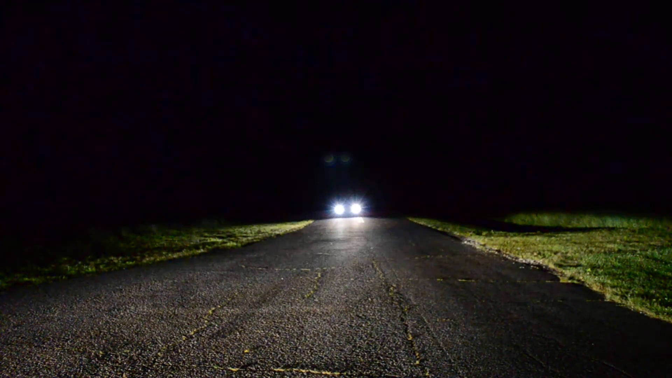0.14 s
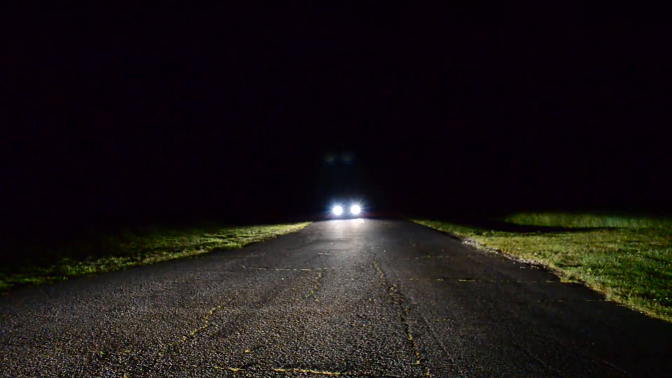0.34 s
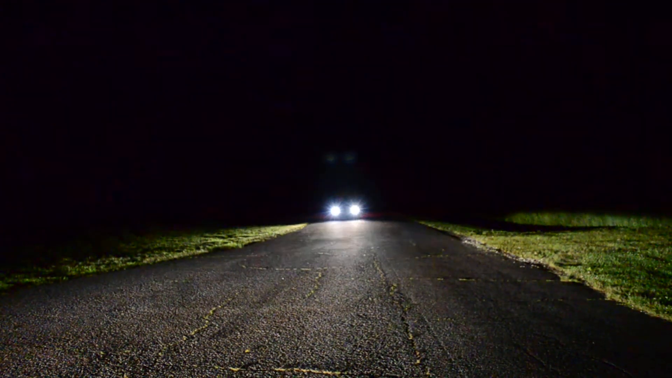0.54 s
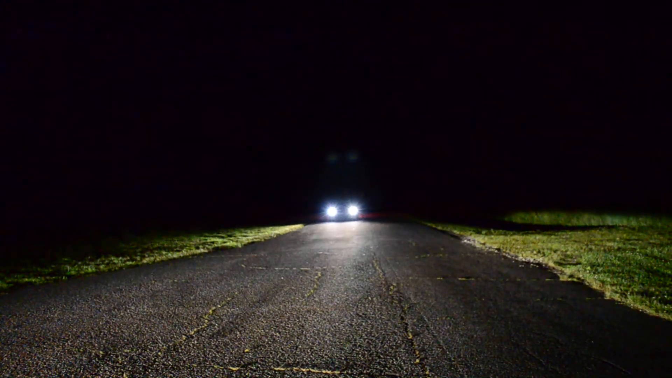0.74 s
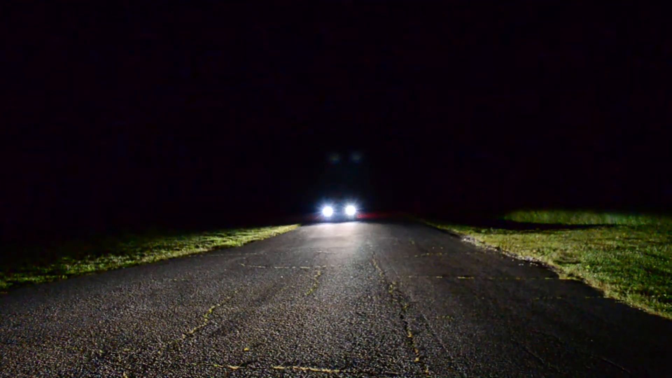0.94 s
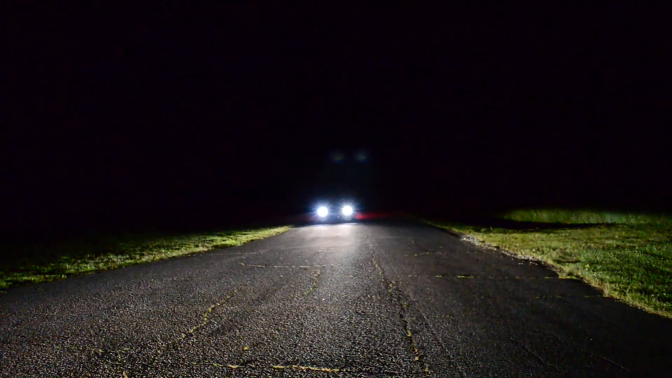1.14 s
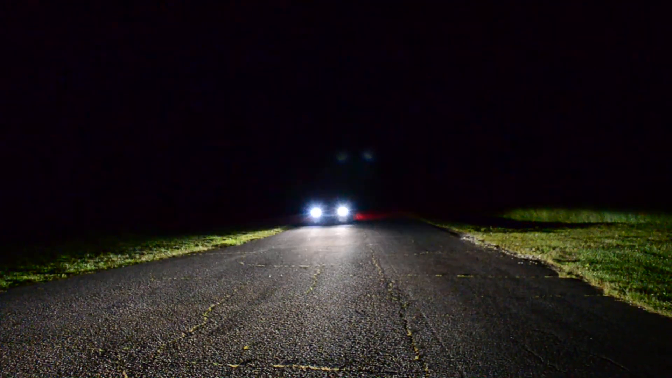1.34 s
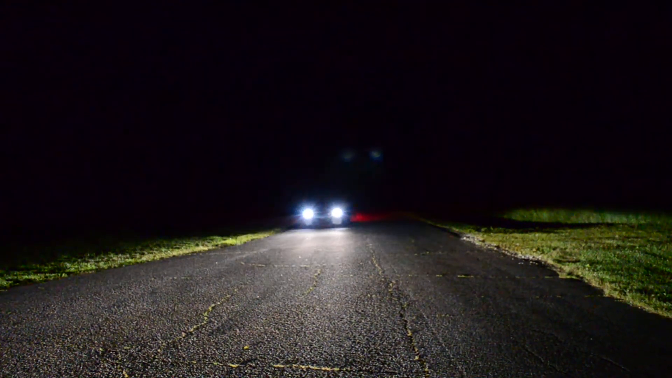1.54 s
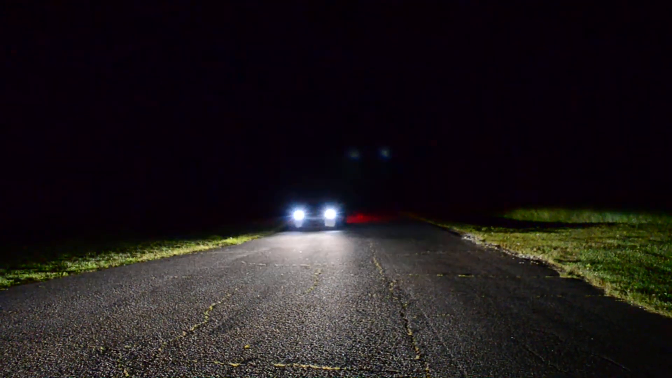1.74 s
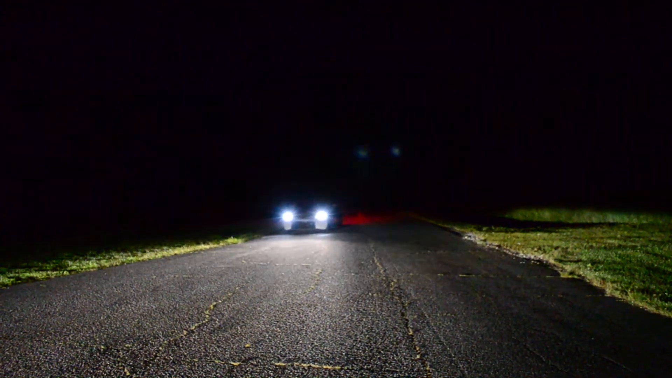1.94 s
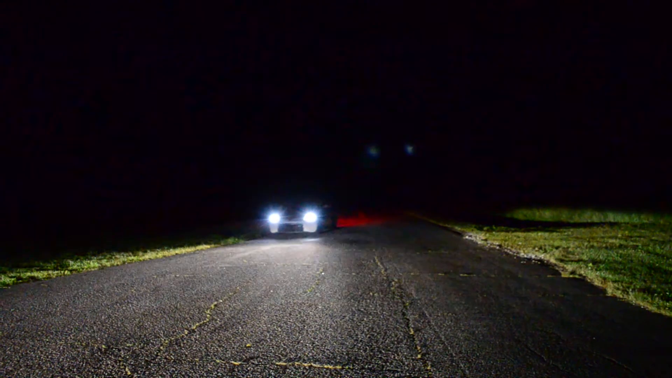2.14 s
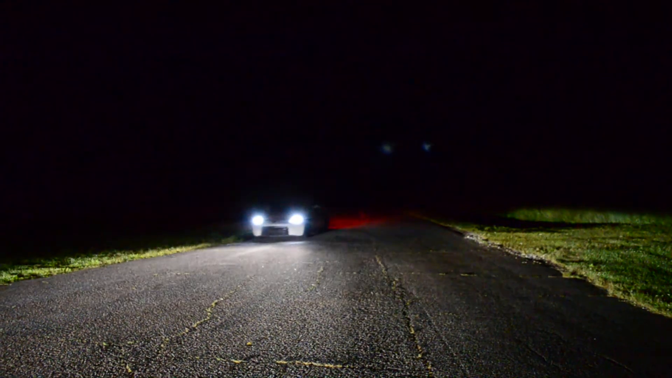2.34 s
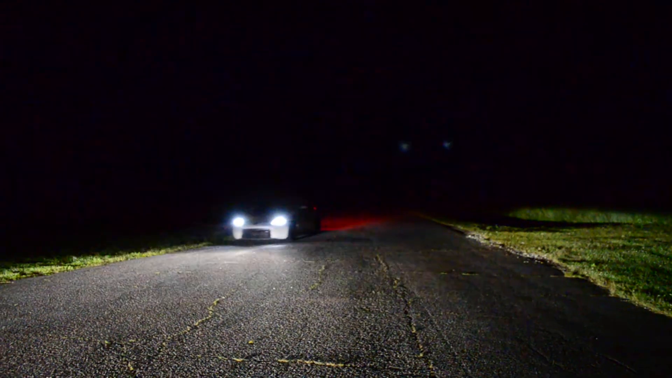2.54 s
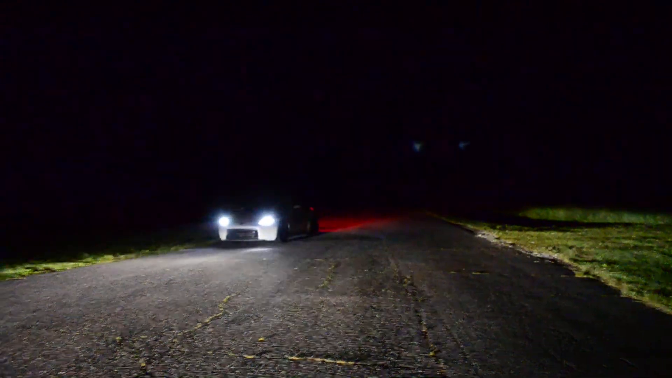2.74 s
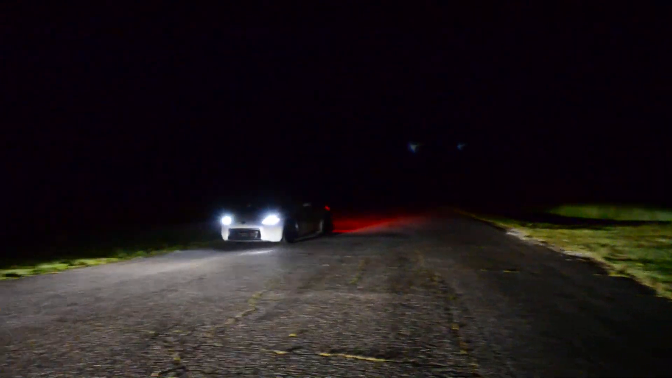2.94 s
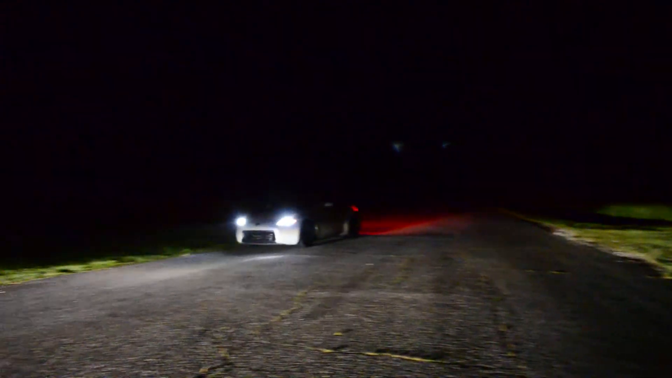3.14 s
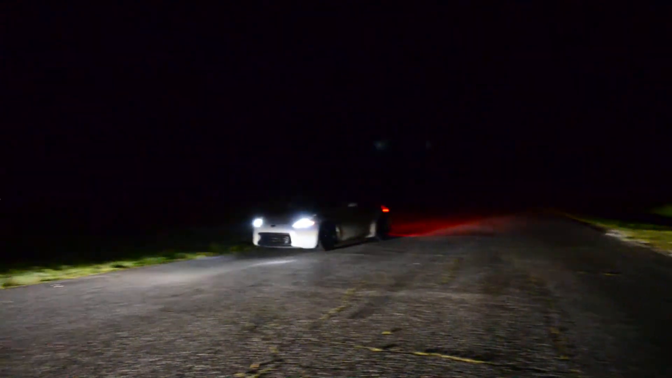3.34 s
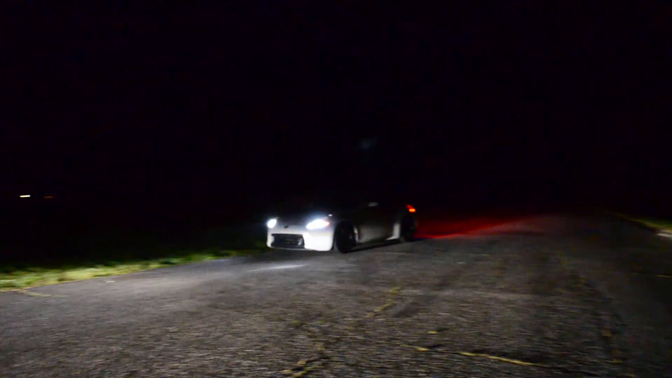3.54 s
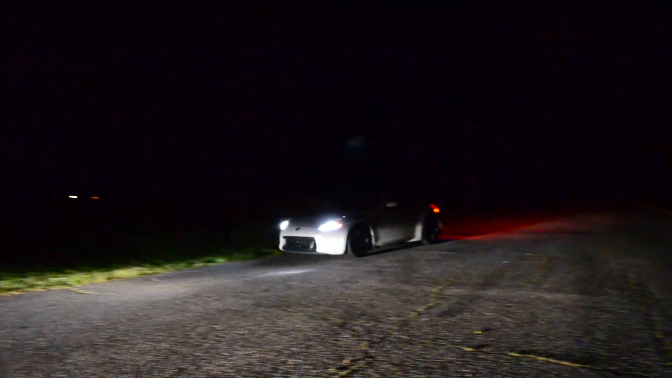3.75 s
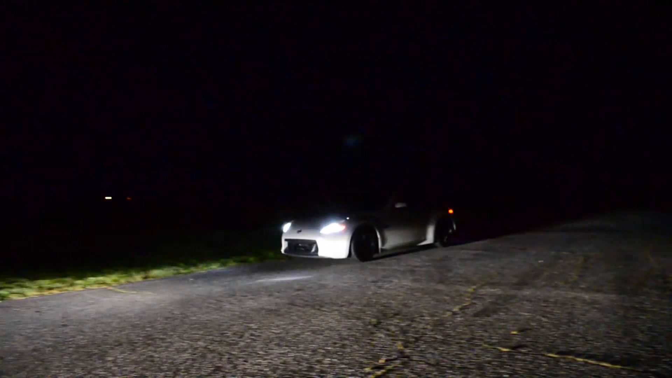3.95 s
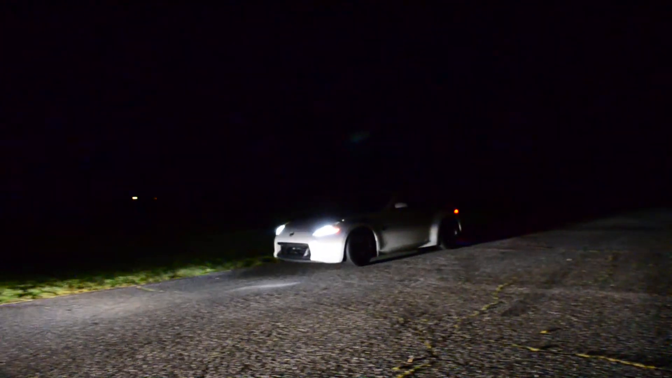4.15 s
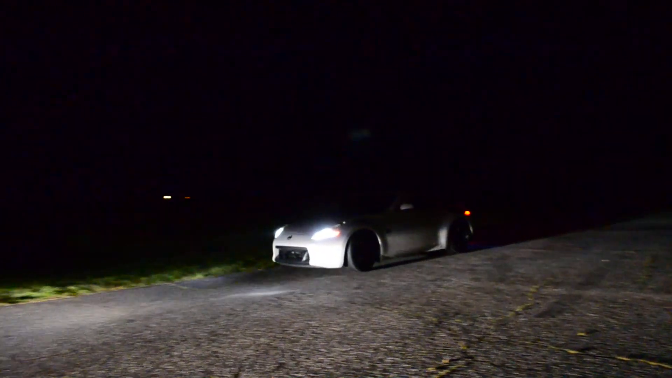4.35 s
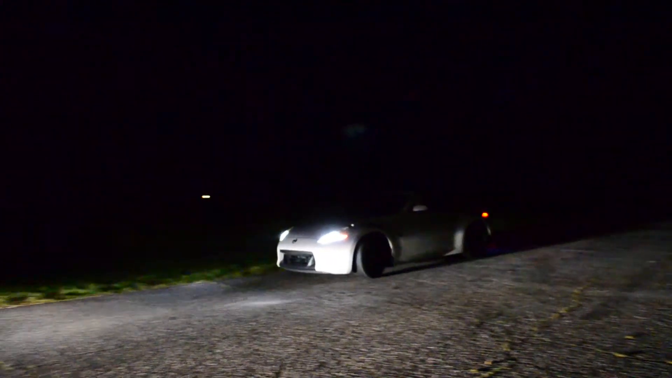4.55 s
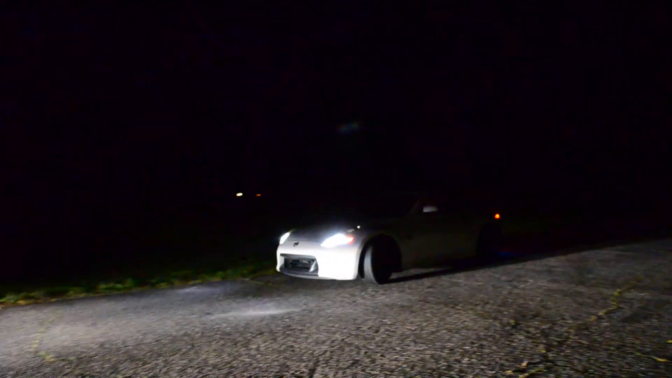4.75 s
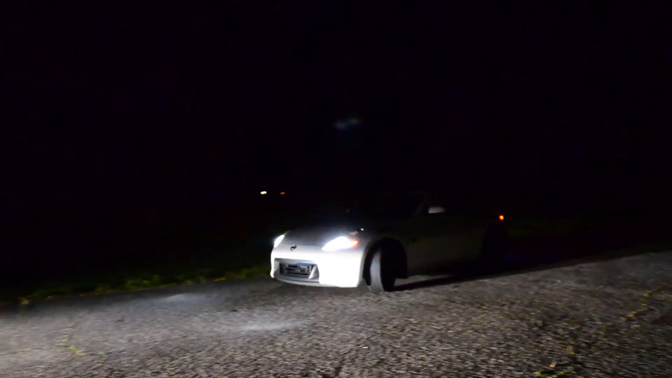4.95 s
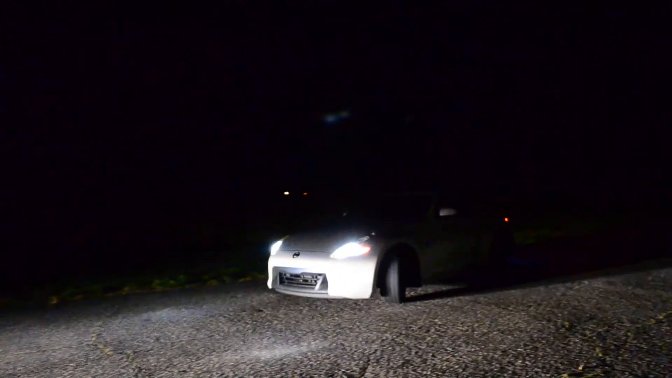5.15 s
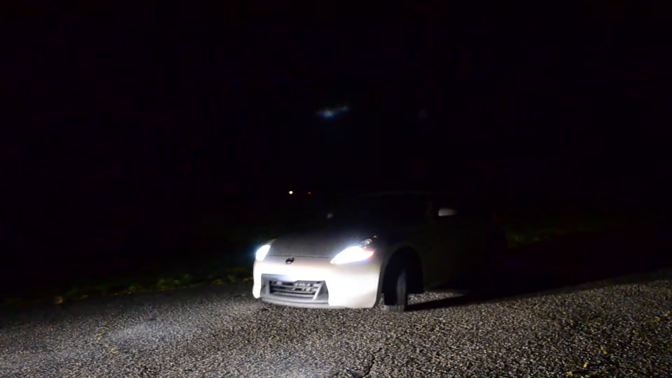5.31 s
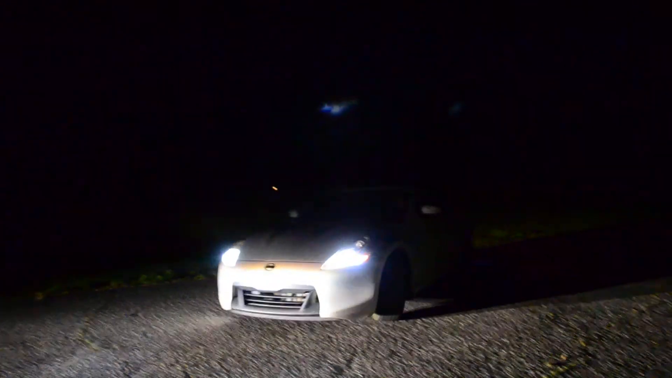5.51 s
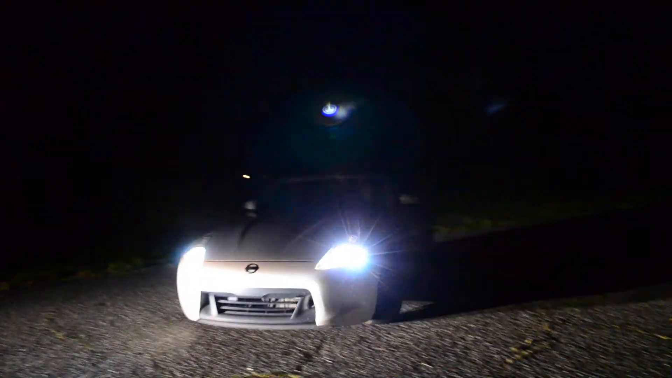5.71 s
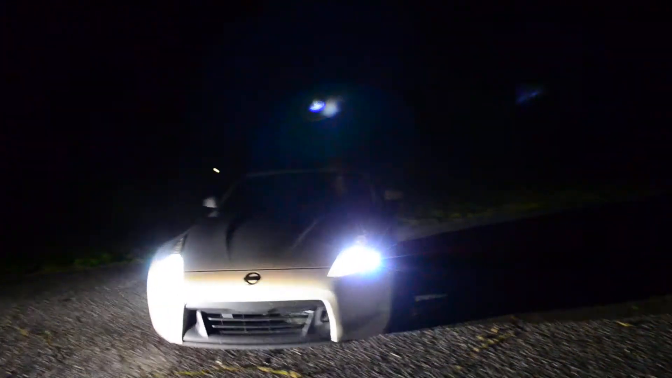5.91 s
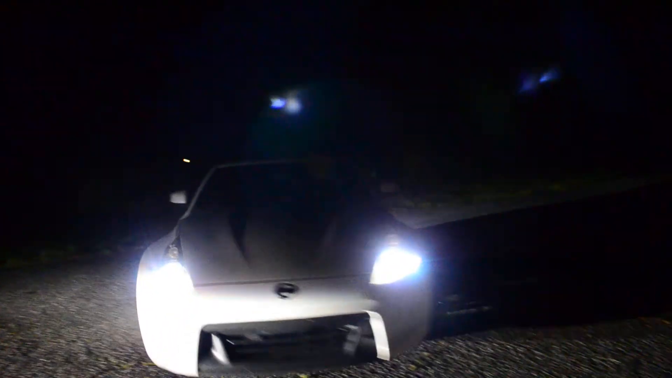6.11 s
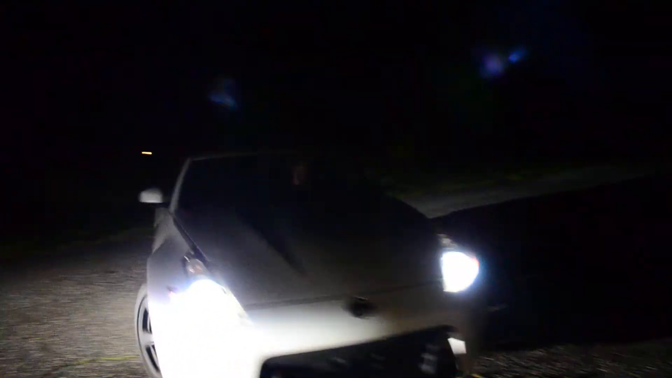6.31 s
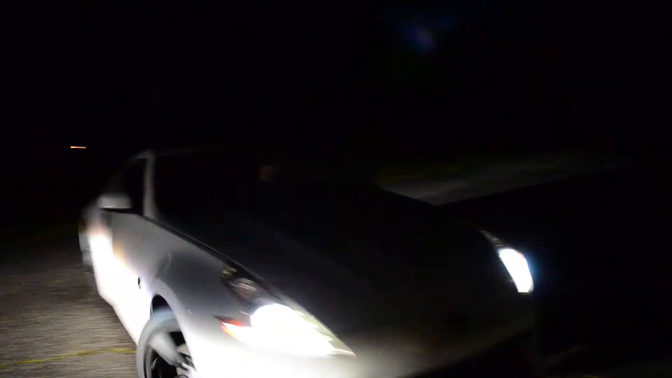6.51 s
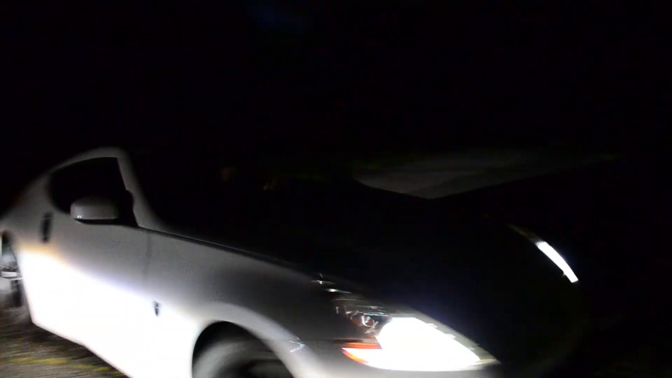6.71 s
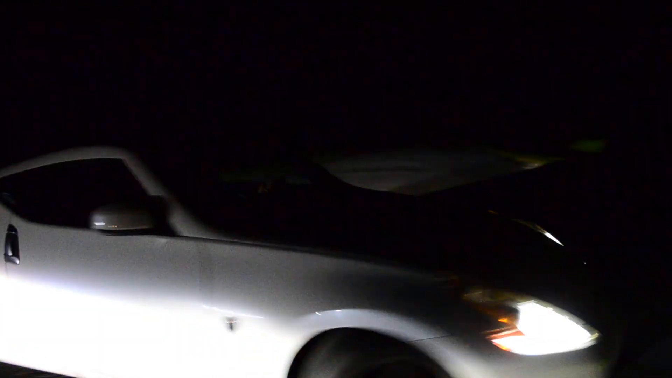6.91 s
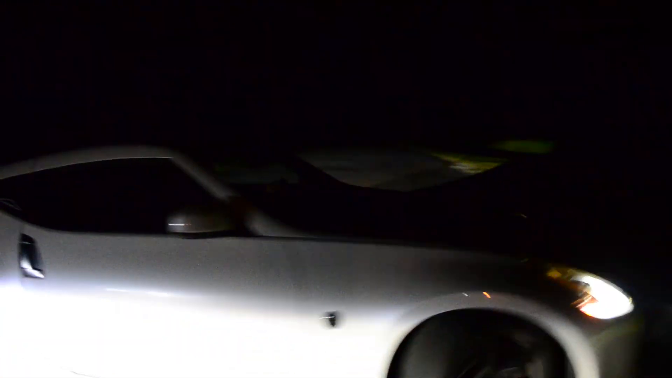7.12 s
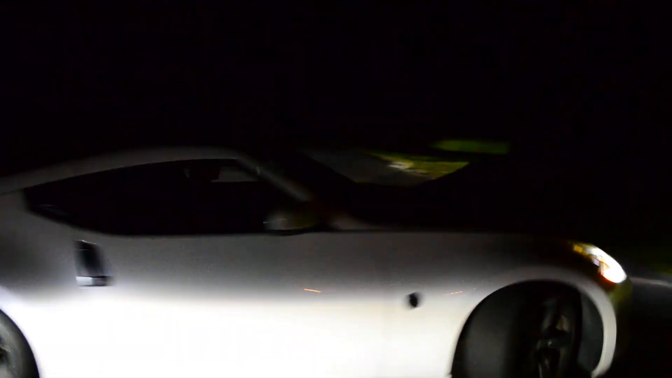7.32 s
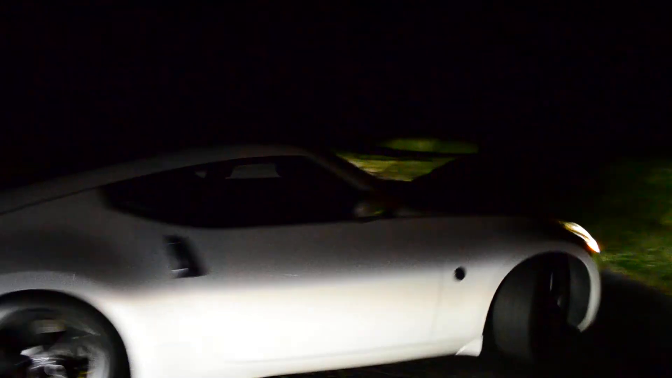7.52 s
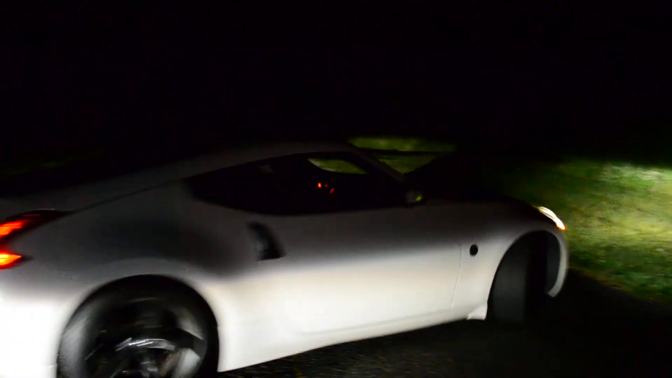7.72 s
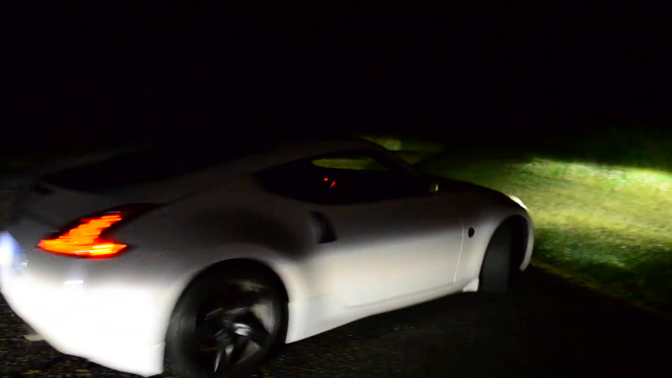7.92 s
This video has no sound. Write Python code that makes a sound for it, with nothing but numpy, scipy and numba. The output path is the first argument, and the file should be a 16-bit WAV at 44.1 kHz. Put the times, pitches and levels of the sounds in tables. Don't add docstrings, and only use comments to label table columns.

```python
import sys
import numpy as np
from scipy import signal
from scipy.io import wavfile
from scipy.ndimage import uniform_filter1d
from numba import njit

SR = 44100
rng = np.random.default_rng(int(sys.argv[2]) if len(sys.argv) > 2 else 0)


def persist_wave(psi):
    counts = np.round(np.clip(psi, -1, 1) * 32767).astype(np.int16)
    wavfile.write(sys.argv[1], SR, np.atleast_2d(counts).T)


def boost(x):
    u = np.asarray(x, float) / 20
    return 10 ** u


N = 351477
T = np.arange(N) / SR

# t/s, stroke rate/Hz, level/dB
TRILL = [(0, 43, -64), (.7, 44.5, -66.5), (1.3, 43, -64.5), (1.7, 44.2, -67.5), (2.74, 43.5, -67.5)]
# from/s, to/s, f/Hz, pulse rate/Hz, level/dB
FROG_RATTLES = [
    (0, 0.347, 2500, 38, -56.5),
    (2.564, 3.398, 2233, 38, -48.5),
    (3.56, 3.749, 2468, 30, -54.5),
]
FROG_SWELL_DB = 2
# t/s, level/dB, f/Hz
CHIRPS = [(.44, -62, 3430), (.97, -68, 3420), (1.01, -61, 3450), (1.58, -60, 3450), (1.99, -60, 3380),
          (2.12, -57, 3450), (2.9, -56, 3200)]

# t/s, rolling noise/dB, distance/m, tread resonance/dB
ROAD = [(0, -31.5, 100, 3), (1.4, -32.5, 75, 0), (1.95, -35, 24, 0.5), (2.84, -35, 21, -1.5),
        (3.44, -37, 17, -3.5), (3.84, -40.5, 12, -6.5), (4.6, -39, 10, -7), (4.9, -36.5, 10, -0.5),
        (5.4, -33.5, 18, 0.5), (5.88, -33.5, 7.8, -2.5), (6.25, -34, 3.1, 1), (6.48, -31, 1.3, 4),
        (6.62, -29.5, 2.2, 1), (6.77, -28, 1.8, 4.5), (7.04, -30, 1.8, 0.5), (7.5, -32, 3.4, -4.5),
        (7.66, -32.5, 3.2, -6.5), (7.97, -32.5, 3.6, 1)]
NEAR_M, DIP_FAR_HZ, DIP_HZ_M = 12.5, 804, 660
# f/Hz, density/dB per Hz
RUMBLE_SPECTRUM = [(12, -67), (20, -29), (64, -1.5), (86, 15), (139, 5), (166, -11), (219, 8), (257, 0),
                   (393, -19.5), (437, -17.5), (480, -17.5), (620, -38), (1060, -120)]
RUMBLE_DB, RUMBLE_PER_LOAD, RUMBLE_PER_BARK, RUMBLE_PER_ROLL = -31, 0.14, 0.3, 0.66
RUMBLE_FAR_TILT_DB, RUMBLE_PIVOT_HZ = 6, 190
# f/Hz, density/dB per Hz
ROAR_FAR = [(400, -11), (500, -4.5), (650, 2), (850, 1.5), (1000, -0.5), (1160, 2), (1430, -15.5),
            (1750, -6.5), (2100, -21), (2500, -32), (3000, -29), (3500, -43.5), (3900, -40), (5500, -54)]
# f/Hz, density/dB per Hz
ROAR_NEAR = [(400, -11), (560, 2), (700, 3), (900, 3.5), (1300, 9), (1650, -2.5), (2000, -5), (2500, -16.5),
             (3500, -17), (4500, -28), (5500, -30.5)]
# f/Hz, density/dB per Hz
HISS_SPECTRUM = [(4500, 0.0), (5500, -4), (7000, -10), (9000, -12.5), (11500, -8), (13500, -15),
                 (14800, -24), (15800, -25)]
SIZZLE_DB, SIZZLE_LOSS_DB_M, HISS_DB, HISS_LOSS_DB_M = -16.5, 0.08, -28.5, 0.36
# from/s, to/s, sizzle/dB, hiss/dB
SCRUBS = [
    (3.251, 3.648, 3.5, 0.5),
    (4.6, 4.998, 2, 1.5),
    (6.373, 6.557, 2, 2.5),
    (7.35, 8.2, -1, 3),
]
# f/Hz, width/Hz, level/dB
HUM = [
    (663, 20, -49.5),
    (1330, 95, -48.5),
    (1867, 70, -53),
]
HUM_FROM_S, HUM_TO_S = 3.3, 5.2
# t/s, peak/dB, body re peak/dB
STONES = [(1.3644, -33.5, 9), (3.3054, -41, 10.5), (4.402, -31, 1), (5.5235, -45, 8.5), (5.91, -29.5, 7.5),
          (6.11, -44.5, 5.5), (6.3893, -31.5, 10.5), (6.4537, -24.5, 7.5), (6.506, -23, 7.5),
          (6.5504, -30, 8.5), (6.609, -30.5, 2), (6.6388, -34.5, -6), (6.7356, -31, 2), (6.763, -41, -3.5),
          (6.8628, -34, 4), (6.881, -25, 8.5), (7.1518, -22, 7), (7.236, -33, 13.5), (7.2876, -25.5, 4.5),
          (7.49, -22.5, 1), (7.7578, -30, 7.5)]
STONE_DECAY_S = 0.0054
# t/s, peak/dB, f/Hz
TICKS = [(1.3638, -44.5, 6950), (5.9122, -52, 6000), (6.389, -39.5, 6590), (6.4265, -41, 7600),
         (6.4543, -42, 6380), (6.4789, -44, 7170), (6.5012, -35, 6180), (6.5488, -36.5, 6550),
         (6.6105, -43, 6200), (6.64, -41.5, 6310), (6.7438, -38, 9830), (6.7672, -36.5, 9660),
         (6.8314, -42.5, 6860), (6.863, -43.5, 7260), (6.9227, -42, 6310), (6.9774, -39, 6490),
         (6.9922, -38.5, 6120), (7.0147, -39, 7080), (7.1524, -32, 7480), (7.2583, -36.5, 6890),
         (7.3037, -37, 6330), (7.323, -37, 7430), (7.477, -39, 7130), (7.4906, -35.5, 7080),
         (7.5738, -41, 6130), (7.6147, -39, 6050), (7.719, -39, 7110), (7.763, -44, 6980),
         (7.788, -37.5, 6200), (7.8533, -36, 6780)]
# t/s, peak/dB, f/Hz
KNOCKS = [(0.887, -26.5, 990), (1.363, -27, 1240), (4.697, -19.5, 1207), (5.079, -22.5, 1330),
          (5.186, -18.5, 1206), (5.214, -24.5, 1130), (5.234, -18.5, 1160), (5.534, -17, 1144),
          (5.609, -23, 1122), (5.815, -17.5, 1251), (5.912, -15.5, 686), (6.206, -26, 1300),
          (6.303, -21, 686), (6.378, -20, 1260), (6.504, -15, 1452), (6.549, -18, 1239),
          (6.608, -12.5, 1380), (6.643, -9, 1362), (6.685, -14, 930), (6.734, -11, 600), (6.75, -10, 646),
          (6.761, -10.5, 1460), (6.797, -8.5, 730), (6.819, -12, 583), (6.951, -15.5, 930),
          (7.093, -16.5, 791), (7.147, -13.5, 713), (7.286, -14, 779), (7.554, -31, 622),
          (7.741, -14.5, 1280)]

# t/s, firing rate/Hz
REVS = [(1.67, 64.65), (1.91, 109.7), (2.0, 114.1), (2.13, 100.4), (2.66, 93.75), (2.95, 86.63),
        (3.21, 72.5), (3.68, 84.5), (4.0, 77.5), (4.44, 77.33), (4.9, 68.22), (5.35, 53), (5.56, 54.15),
        (6.29, 67.5), (6.58, 61.34), (6.89, 47.24), (7.5, 71.6), (7.88, 79.3)]
# t/s, level/dB
LOAD = [(1.65, -46.5), (1.78, -26.5), (2.35, -24.5), (2.5, -21), (2.93, -20), (3.2, -34.5), (3.6, -22),
        (4.0, -26), (5.03, -28.5), (5.15, -23.5), (5.4, -28), (5.75, -24.5), (6.05, -15.5), (6.2, -19),
        (6.55, -26), (6.9, -22.5), (7.3, -17), (7.55, -22.5)]
# f/Hz, gain/dB
BOOM = [(48, -20.5), (60, -15.5), (69, -1.5), (106, -1.5), (123, 3.5), (135, -2), (160, -10.5), (195, -23)]
# multiple of firing rate, level/dB
ORDERS = [(2.5, -4), (3, -0.5), (3.5, -9.5), (4, 0), (4.5, -5), (5, -0.5), (6, -4)]
# f/Hz, width/Hz, gain/dB
PIPE = [(120, 44, 5.5), (190, 19, 2.5), (270, 29.3, 6), (326.5, 20, -7.5)]
# t/s, length/s, level/dB, start f/Hz, end f/Hz
RINGS = [
    (1.56, 0.17, -29, 109.3, 127),
    (2.41, 0.12, -33, 190, 191),
    (7.072, 0.267, -33.5, 329.8, 388),
    (7.569, 0.27, -27, 264.6, 278),
]
# from/s, to/s, extra scatter 0-1
COASTS = [
    (-1, 1.52, .55),
    (3.0, 4.6, .17),
    (4.6, 5.08, .7),
    (5.08, 5.5, .25),
    (6.3, 7.05, .15),
    (6.78, 6.95, .2),
    (7.4, 9, .06),
]
STEADY_ROUGH, COAST_EASE_S = 0.17, 0.2
# from/s, to/s, gain/dB
BARKS = [
    (2.45, 3.1, 5),
    (3.403, 4.55, -2),
    (5.894, 6.494, 5.5),
    (7.23, 7.91, 9.5),
    (7.42, 7.74, 5.5),
]
BARK_EASE_S = 0.034
BANK_DB, FLUTTER_DB = -14, 2
UPPER_DB, UPPER_PER_LOAD, UPPER_NEAR_DB = -55, 0.57, 9.5
NOSE_S, NOSE_BASS_DB, NOSE_OCTAVE_DB = 5.17, -10.5, 4
TAIL_S, TAIL_SWING_S, TAIL_BASS_DB, TAIL_BANK_DB = 7.22, 0.21, 21, 12

# f/Hz, level/dB
WHINE = (15669, -84)
LOW_CUT_HZ, CEILING = 59.4, 1


def level(x, db):
    return x * boost(db) / np.sqrt(np.mean(x ** 2))


def curves(table):
    s, *columns = np.transpose(table)
    return [np.interp(T, s, c) for c in columns]


def shade(points, hz):
    f, db = np.transpose(points)
    return np.interp(np.log(hz), np.log(f), db)


def ease(s, width_s):
    return 0.5 + 0.5 * np.tanh((T - s) / width_s)


def spell(from_s, to_s, ease_s):
    return ease(from_s, ease_s) - ease(to_s, ease_s)


def noise():
    return rng.standard_normal(N)


def walk(rate_hz):
    k = int(SR / rate_hz)
    held = np.repeat(rng.standard_normal(N // k + 1), k)
    return 1.347 * uniform_filter1d(uniform_filter1d(held, k), k)[:N]


@njit
def svf(x, hz, width):
    y, b, l = np.empty(len(x)), 0., 0.
    g, k = np.tan(np.pi * hz / SR), width / hz
    for i in range(len(x)):
        v = (b + g * (x[i] - l)) / (1 + g * (g + k))
        b, l, y[i] = 2 * v - b, l + 2 * g * v, k * v
    return y


def resonate(x, hz, width_hz):
    hz, width_hz = float(hz), float(width_hz)
    return svf(svf(x, hz, width_hz), hz, width_hz)


def bands(source, lo_hz, hi_hz, colour, flicker_db, count):
    out, power = 0, 0
    for hz in np.geomspace(lo_hz, hi_hz, count):
        width_hz = hz * np.log(hi_hz / lo_hz) / count * 2
        gain = boost(colour(hz)) * np.sqrt(hz)
        band = resonate(source(), hz, width_hz)
        out = out + gain * boost(flicker_db * walk(9)) * band / np.std(band)
        power = power + gain ** 2
    return out / np.sqrt(power)


def add_puff(out, s, db, hz, width_hz, decay_s):
    t = np.arange(1500) / SR
    puff = rng.standard_normal(len(t)) * np.exp(-t / decay_s)
    puff[0] += 4
    puff = resonate(puff, hz, width_hz)
    i = int(s * SR)
    out[i:i + len(t)] += (puff * boost(db) / np.abs(puff).max())[:N - i]


def trill(table, hz, sweep_hz, duty):
    rate_hz, db = curves(table)
    strokes = np.cumsum(rate_hz * (1 + 0.017 * walk(21))) / SR
    part = strokes % 1 / duty
    strength = boost(2.5 * rng.standard_normal(400))[strokes.astype(int)]
    pitch_hz = hz * (1 + 0.014 * walk(500)) + sweep_hz * (np.minimum(part, 1) - 0.5)
    envelope = strength * (part < 1) * np.sin(np.pi * part) ** 2
    note = envelope * np.sin(2 * np.pi * np.cumsum(pitch_hz) / SR)
    alive = uniform_filter1d(1. * (T >= table[0][0]) * (T < table[-1][0]), size=400)
    return level(note, 0) * boost(db) * alive


def night():
    out = trill(TRILL, 4380, -480, 0.79)
    out = 0.95 * out + 0.25 * np.roll(out, 430)
    for a, b, hz, rate_hz, db in FROG_RATTLES:
        soft_db = db - FROG_SWELL_DB
        swell = [(a, rate_hz, soft_db), ((a + b) / 2, rate_hz, db), (b, rate_hz, soft_db)]
        out += trill(swell, hz, 380, 0.51)
    for s, db, hz in CHIRPS:
        envelope = np.exp(-((T - s - 0.015) / 0.019) ** 2)
        out += boost(db) * envelope * np.sin(2 * np.pi * hz * T)
    return out


def road():
    roll_db, metres, lift_db = curves(ROAD)
    metres = np.maximum(metres, 1)
    return roll_db, metres, np.exp(-metres / NEAR_M), lift_db


def bark():
    return sum(db * spell(a, b, BARK_EASE_S) for a, b, db in BARKS)


def hum():
    tones = sum(level(resonate(noise(), hz, width_hz), db) * boost(2.5 * walk(7))
                for hz, width_hz, db in HUM)
    return tones * spell(HUM_FROM_S, HUM_TO_S, 0.3)


def stones():
    out = np.zeros(N)
    for s, db, body_db in STONES:
        add_puff(out, s, db - 19.5, 3600, 4500, STONE_DECAY_S)
        add_puff(out, s, db + body_db - 4.5, 1800, 1800, STONE_DECAY_S)
    for s, db, hz in TICKS:
        add_puff(out, s, db - 0.5, hz + 2500, 10000, 0.003)
    for s, db, hz in KNOCKS:
        add_puff(out, s, db - 2.5, hz, 550, 0.004)
    return out


def bell(hz, centre_hz, octaves):
    return np.exp(-(np.log2(hz / centre_hz) / octaves) ** 2)


def tyres():
    roll_db, metres, near, lift_db = road()
    tilt_db = RUMBLE_FAR_TILT_DB * (metres / 60 - 0.4)
    dip_hz = DIP_FAR_HZ + DIP_HZ_M / metres

    def rumble_colour(hz):
        return shade(RUMBLE_SPECTRUM, hz) + tilt_db * np.tanh(3 * np.log2(hz / RUMBLE_PIVOT_HZ))

    def roar_colour(hz):
        spectrum_db = (1 - near) * shade(ROAR_FAR, hz) + near * shade(ROAR_NEAR, hz)
        return spectrum_db + lift_db * bell(hz, 1250, 0.27) - 9 * bell(hz, dip_hz, 0.24)

    def hiss_colour(hz):
        return shade(HISS_SPECTRUM, hz) - 4.5 * near * bell(hz, 11500, 0.3)

    size = np.minimum(boost(6.5 * rng.exponential(size=N)), 5)
    grit = (rng.random(N) < (60 + 420 * near ** 3) / SR) * size * np.sign(noise())
    crunch = uniform_filter1d(np.abs(grit), size=150) * 150

    rumble = bands(noise, 39.6, 458.6, rumble_colour, 1.0, count=13)
    roar = bands(lambda: noise() * (1 + 0.29 * near * np.minimum(crunch, 2)),
                 412.0, 2122, roar_colour, 1.93, count=17)
    sizzle = bands(lambda: noise() * (1 + 0.18 * near * crunch), 2337, 5140, roar_colour, 1.9, count=8)
    hiss = bands(lambda: noise() * (1 + 0.086 * crunch) + 1.5 * grit,
                 5680, 15500, hiss_colour, 0.81, count=10)

    sizzle_db = roll_db + SIZZLE_DB - SIZZLE_LOSS_DB_M * metres - 0.53 * lift_db
    sizzle_db += sum(db * spell(a, b, 0.092) for a, b, db, _ in SCRUBS)
    hiss_db = roll_db + HISS_DB - HISS_LOSS_DB_M * metres - 0.2 * lift_db
    hiss_db += sum(db * spell(a, b, 0.03) for a, b, _, db in SCRUBS)
    load_db, = curves(LOAD)
    rumble_db = RUMBLE_DB + RUMBLE_PER_LOAD * (load_db + 25)
    rumble_db += RUMBLE_PER_BARK * bark() + RUMBLE_PER_ROLL * near * (roll_db + 35.5)
    return boost(rumble_db) * rumble + boost(roll_db) * roar + boost(sizzle_db) * sizzle + boost(hiss_db) * hiss


def rings():
    out = np.zeros(N)
    for s, length_s, db, start_hz, end_hz in RINGS:
        part = np.clip((T - s) / length_s, 0, 1)
        pitch_hz = start_hz + (end_hz - start_hz) * part
        tone = np.sin(2 * np.pi * np.cumsum(pitch_hz) / SR)
        out += np.sqrt(2) * boost(db) * np.sin(np.pi * part) * tone
    return out


def engine():
    hz, = curves(REVS)
    load_db, = curves(LOAD)
    rough = STEADY_ROUGH + sum(r * spell(a, b, COAST_EASE_S / 2) for a, b, r in COASTS)

    tone_db = load_db + shade(BOOM, hz)
    tone_db += NOSE_BASS_DB * ease(NOSE_S, TAIL_SWING_S) + TAIL_BASS_DB * ease(TAIL_S, TAIL_SWING_S)
    octave_db = load_db + shade(BOOM, 2 * hz)
    octave_db += NOSE_OCTAVE_DB * spell(NOSE_S, TAIL_S + 0.41, TAIL_SWING_S / 2)
    bank_db = load_db + np.minimum(shade(BOOM, 3 * hz / 2), 0) + BANK_DB
    bank_db += TAIL_BANK_DB * ease(TAIL_S + 0.2, TAIL_SWING_S / 2) + FLUTTER_DB * walk(12)
    upper_db = UPPER_DB + UPPER_PER_LOAD * (load_db + 24) + UPPER_NEAR_DB * road()[2] + bark()

    firing = np.cumsum(hz * (1 + 0.00593 * walk(20))) / SR
    phase = 2 * np.pi * firing

    def uneven():
        return np.interp(firing, np.arange(1000), rng.standard_normal(1000))

    throb = 0.48 * rough * np.sin(phase / 3 + 0.93 * walk(4.3))
    tone = (1 + throb + 0.65 * rough * uneven()) * np.sin(phase + 0.15 * rough * uneven())
    octave = (1 + throb + 0.7 * rough * uneven()) * np.sin(2 * phase + 1.6 + 0.8 * rough * uneven())
    bank = (1 + 1.2 * rough * uneven()) * np.sin(3 * phase / 2 + 1.3 * rough * uneven())
    lines = boost(tone_db) * tone + boost(octave_db) * octave + boost(bank_db) * bank

    upper = np.zeros(N)
    for k, db in ORDERS:
        jitter = (0.072 + 2.7 * rough) * uneven()
        upper += boost(db + 3.0 * walk(6.7)) * np.sin(k * phase + 6 * rng.random() + jitter)
    piped = sum(boost(db) * svf(upper, float(f), float(w)) for f, w, db in PIPE)
    return np.sqrt(2) * (lines + boost(upper_db) * (0.23 * upper + piped))


def scene():
    return (night() + hum() + stones() + tyres() + rings() + engine())[None]


def top_cut(x):
    return signal.sosfilt(signal.butter(12, 15830, fs=SR, output="sos"), x)


def record(dry):
    low_cut = signal.butter(4, LOW_CUT_HZ, "high", fs=SR, output="sos")
    heard = signal.sosfilt(low_cut, dry)
    heard = heard / (1 + (np.abs(heard) / CEILING) ** 4) ** 0.25
    whine_hz, whine_db = WHINE
    whine = np.sqrt(2) * boost(whine_db) * np.sin(2 * np.pi * whine_hz * T)
    low_rumble = level(svf(noise(), 30., 30.), -52)
    return top_cut(heard + whine + low_rumble)


dry = scene()
out = record(dry)
persist_wave(out)
```